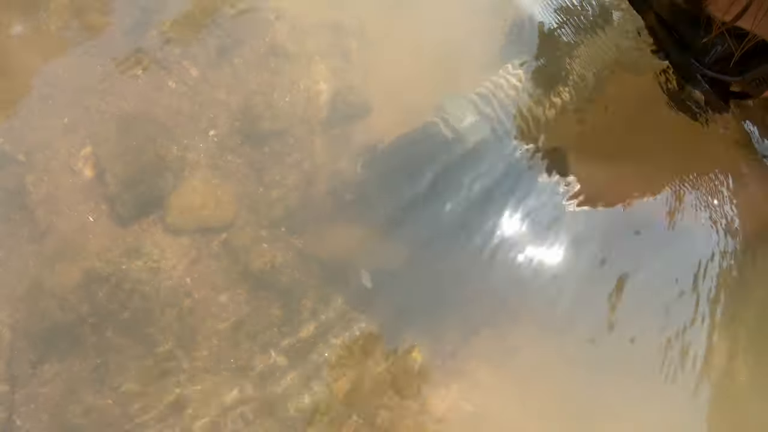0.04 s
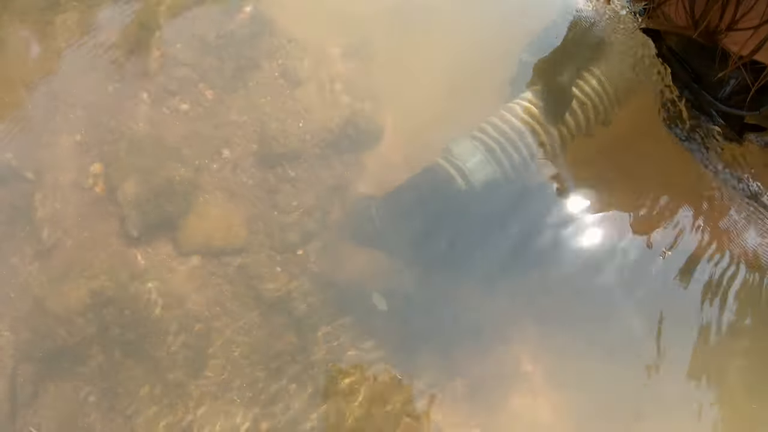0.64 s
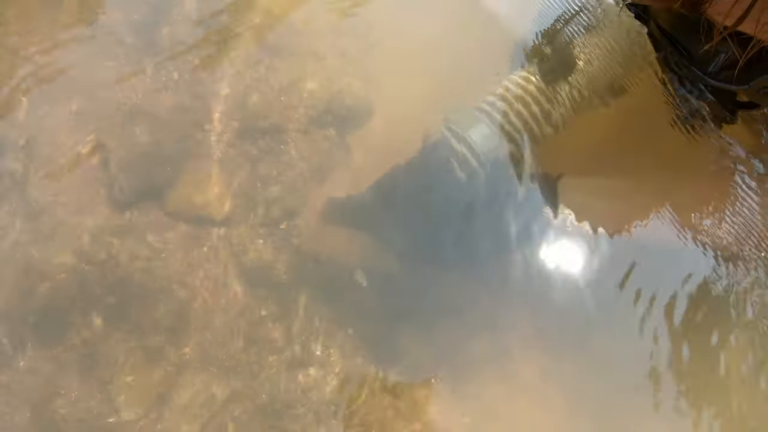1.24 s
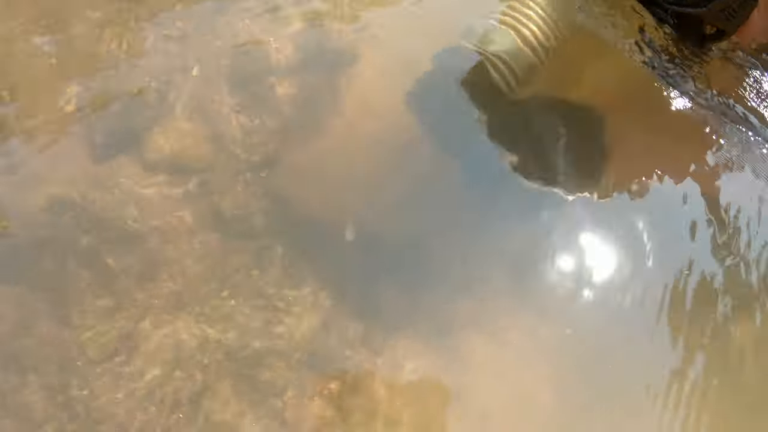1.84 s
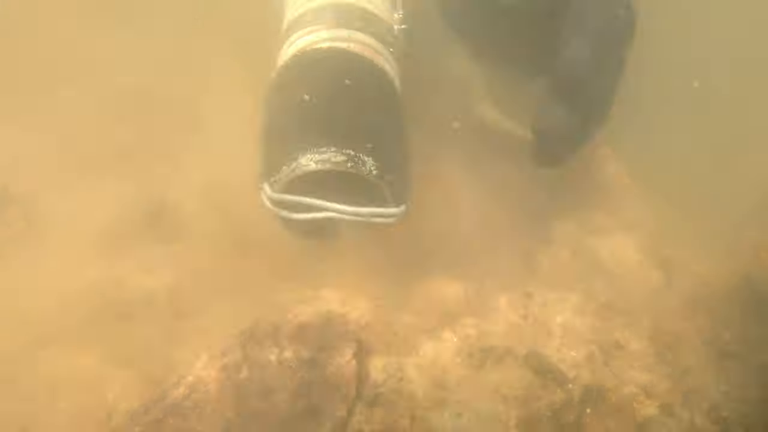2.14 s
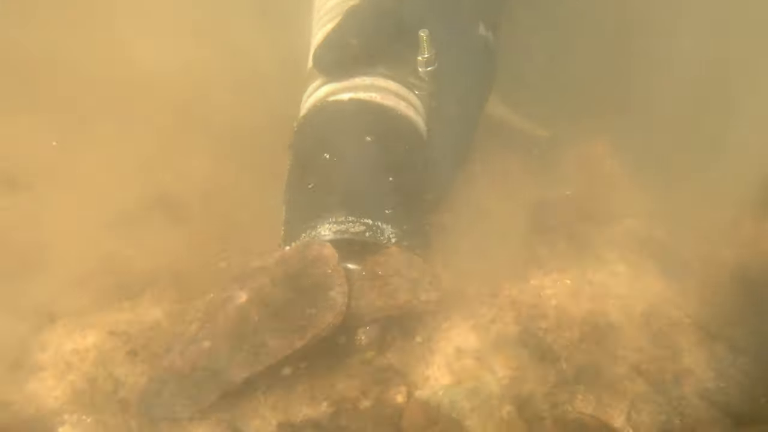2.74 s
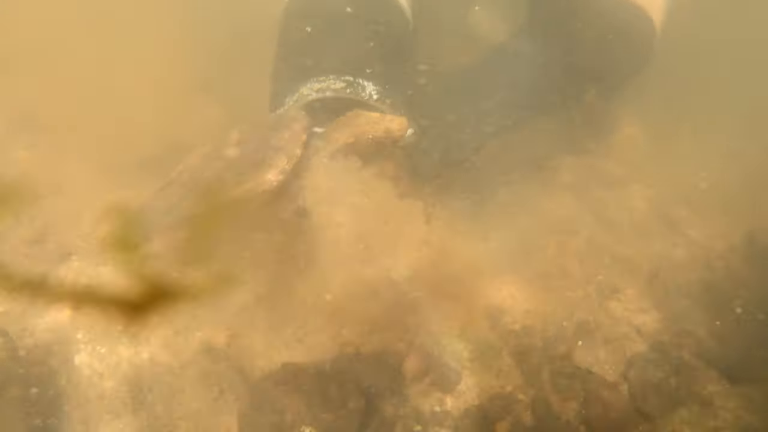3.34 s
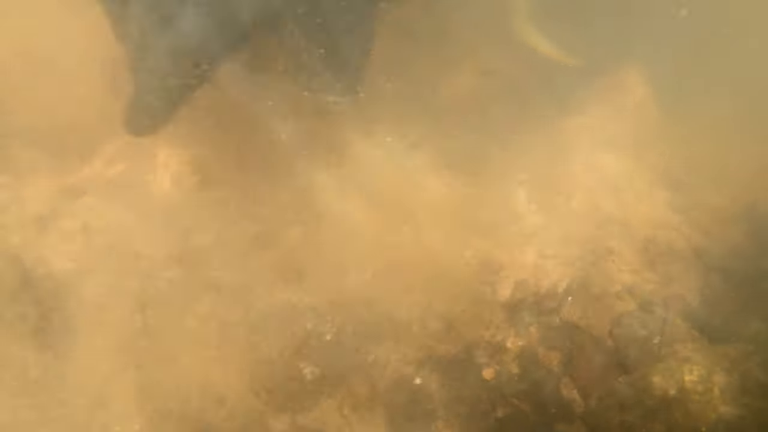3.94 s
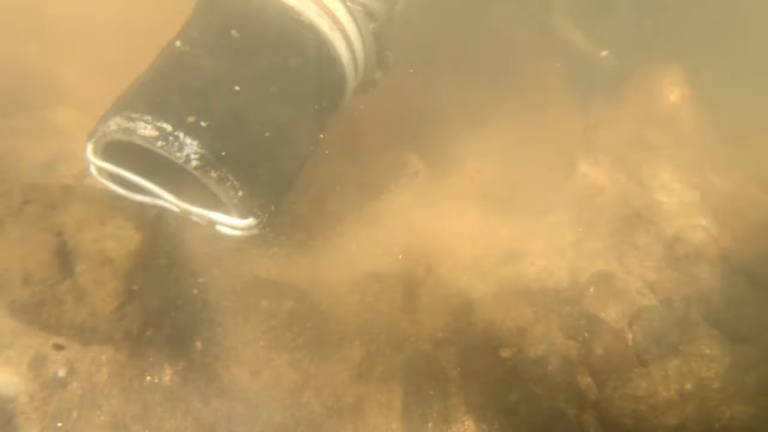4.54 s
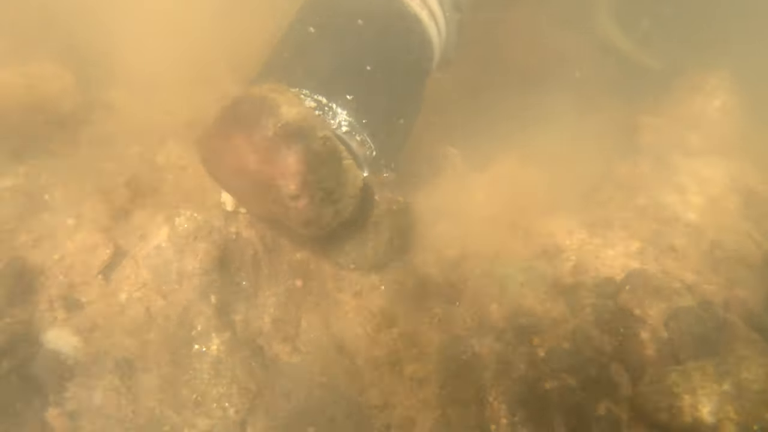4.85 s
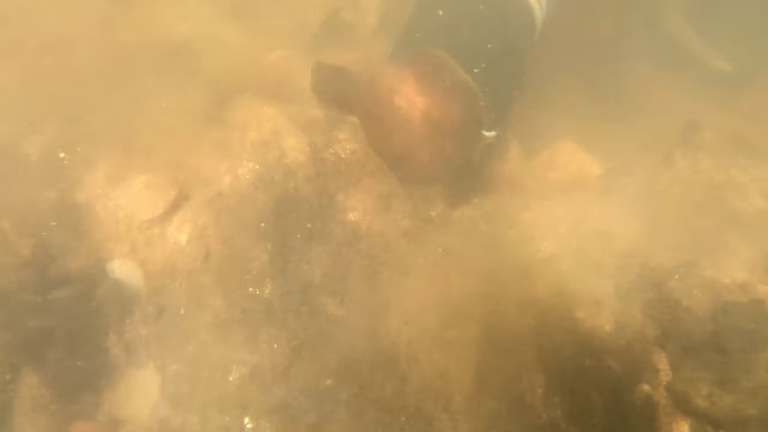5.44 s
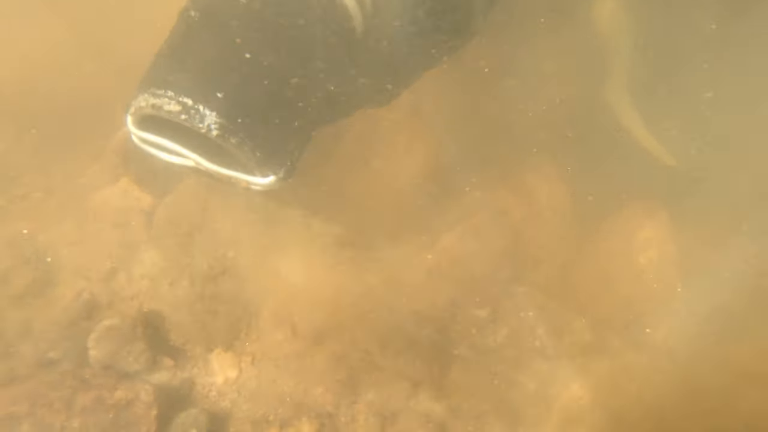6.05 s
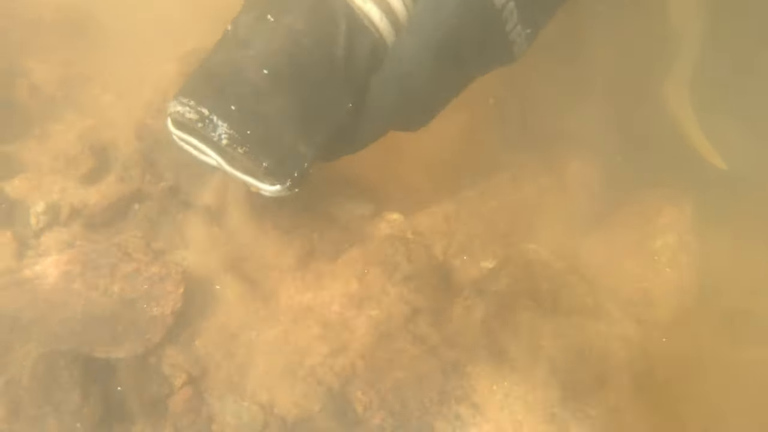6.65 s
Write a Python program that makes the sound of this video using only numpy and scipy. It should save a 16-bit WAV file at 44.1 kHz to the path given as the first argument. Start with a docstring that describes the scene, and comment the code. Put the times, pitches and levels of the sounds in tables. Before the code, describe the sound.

Underwater, pebbles tick and rattle into a suction nozzle over a low water rumble and the muffled hum of an engine and pump.

```python
"""A suction dredge's small four-stroke engine drones under water, its pump churning in step.
Gravel ticks and tumbles up the hose, stones grind and knock on the nozzle, a rock bumps in its mouth.
Bubbles plip; water rumbles past and hisses into the intake. A camera near the nozzle hears most of it
through the modes of its sealed housing, and hard knocks duck its gain."""
import sys
import numpy as np
from scipy import signal
from scipy.fft import rfft, irfft, next_fast_len
from scipy.io import wavfile
from scipy.ndimage import uniform_filter1d, minimum_filter1d, map_coordinates

SR = 44100
rng = np.random.default_rng(int(sys.argv[2]) if len(sys.argv) > 2 else 0)


def output_pcm(signal):
    """Save a mono or channel-first signal as 16-bit PCM at the path in sys.argv[1].

    Samples are clipped to [-1, 1] before scaling.
    """
    pcm = np.clip(np.atleast_2d(signal).T, -1, 1) * 32767
    wavfile.write(sys.argv[1], SR, np.round(pcm).astype(np.int16))


N = 295646

# Engine speed. Each row: time in seconds, firing rate in Hz.
FIRING_HZ = [(0, 31.3), (.25, 31.28), (.7, 30.73), (.98, 30.92), (1.32, 30.88), (1.58, 31.2), (1.85, 31.03),
             (2.25, 31.2), (2.56, 30.73), (2.92, 31.07), (3.2, 30.66), (3.6, 31.05), (3.95, 30.95),
             (4.55, 31.18), (5.45, 31.12), (5.85, 31.33), (6.7, 30.95)]
# How strongly the engine carries. Each row: time in seconds, gain in dB.
DRONE_DB = [(0, -14.5), (4.4, -15.5), (4.8, -19), (5.66, -18.5), (5.72, -20.5), (6.7, -20)]
# Engine and pump orders. Each row: multiple of the firing rate, left and right gain in dB.
ORDERS = [(2.003, -15, -14.5), (2.964, -16, -13.5), (4.023, -18.5, -17), (4.996, -17.5, -20),
          (5.972, -16, -16.5), (6.975, -28.5, -30), (9.004, -25.5, -19.5), (10.95, -26.5, -15),
          (11.934, -34, -17), (13.09, -25, -18), (14.03, -17, -15), (15.11, -27.5, -19),
          (16.09, -19, -14.5), (16.87, -19.5, -19), (17.92, -17, -15), (18.46, -17.5, -21),
          (19.92, -14, -19), (21.24, -13, -19.5), (21.99, -21, -23), (32.4, -26, -30)]
# Housing delay at the right microphone. Each row: frequency in Hz, lag in radians.
RIGHT_LAG_RAD = [(340, 0.01), (400, 1.74), (690, 3.5)]
# A rock blocks the nozzle; the pump labours. Each row: centre and half length in seconds, extra load in dB.
CHOKE = [(5.52, 0.11, -3)]

# Surges of sand, clacking stones and tumbling stones.
# Each row: centre in seconds, half length in seconds, level in dB.
GULPS = [(.54, 0.091, -39), (.79, 0.068, -36), (1.39, 0.04, -42.5), (2.59, 0.15, -38), (3.08, 0.031, -38),
         (3.95, 0.064, -42.5), (4.94, .2, -43.5)]
CLACKS = [(3.07, 0.078, -41.5), (3.92, 0.18, -42.5), (4.97, 0.23, -39)]
TUMBLES = [(3.05, 0.12, -29.5), (4.8, .045, -20), (5.25, .17, -26.5), (6.6, 0.18, -26)]
# Pebbles on the nozzle. Each row: time in seconds, level in dB, treble tilt in dB per octave.
PEBBLES = [(0.1275, -31.5, 6.5), (.401, -32.5, 4), (.5049, -23, 1.5), (0.5121, -24, 5), (.581, -32, 0.5),
           (.735, -27.5, 5.5), (0.7466, -31, 6), (0.76, -29, 14), (0.8188, -21.5, 3.5), (0.829, -30, 6.5),
           (1.5771, -35, 6.5), (2.5032, -35, 10.5), (2.522, -27, 8), (2.5656, -32, 8.5),
           (2.5826, -26, -0.5), (2.6676, -31.5, 7.5), (2.701, -26, -4), (2.7429, -32, -0.5),
           (2.802, -27.5, -9.5), (2.916, -28, 5.5), (2.9905, -30.5, -14), (3.025, -25.5, -5),
           (3.0409, -27, -9), (3.0925, -27.5, 1.5), (3.1374, -26.5, 1.5), (3.1978, -32, -1),
           (3.7722, -27.5, -4.5), (4.08, -34.5, 8), (4.592, -21.5, 1), (4.8814, -23.5, -1),
           (4.9183, -25.5, 1), (4.9417, -36.5, 4), (4.9624, -21.5, 5.5), (4.972, -24, -5.5),
           (5, -25.5, 2.5), (5.02, -21, -2), (5.1135, -32, 1.5), (5.382, -28, 3.5), (5.39, -27.5, 2.5),
           (5.446, -30.5, 4.5), (5.5304, -23.5, -1), (5.732, -26, 0.5), (6.541, -26.5, -2),
           (6.566, -21.5, -1)]
# Stones grinding. Each row: start in seconds, centre in Hz, peak in dB, length in seconds.
GRINDS = [(1.143, 1830, -15, 0.0079), (1.391, 1660, -15, 0.025), (1.412, 1320, -11, 0.027),
          (1.836, 1400, -14, 0.017), (1.897, 1580, -17.5, 0.018), (1.916, 1300, -8.5, 0.0053),
          (2.424, 1090, -7, 0.0055), (3.123, 1200, -11.5, 0.019), (3.955, 1560, -13.5, 0.0044),
          (4.748, 1710, -18, 0.03), (4.791, 1200, -24, 0.041), (5.023, 1390, -12.5, 0.018),
          (5.053, 1550, -19, 0.019), (5.083, 1150, -11.5, 0.012), (5.213, 1690, -18, 0.03),
          (5.284, 1100, -15.5, 0.0076)]
# Heavy stones on the nozzle. Each row: time in seconds, peak in dB, low-pass corner in Hz.
KNOCKS = [(4.4484, 3, 705), (4.5008, 3.5, 990), (4.512, -4, 1370), (5.057, -11, 1000), (6.434, -4, 810),
          (6.492, -13.5, 1010), (6.542, -2.5, 1380), (6.584, -2.5, 770), (6.608, -10.5, 840)]
# Rock bumps and bubbles. Each row: start in seconds, pitch in Hz, peak in dB.
THUMPS = [(2.703, 460, -10.5), (3.022, 394, -11.5), (4.645, 446, -15), (4.672, 390, -15.5),
          (4.695, 505, -11.5), (4.745, 346, -13), (4.788, 390, -13.5), (4.81, 382, -9.5), (5.008, 460, -15),
          (5.13, 423, -12.5), (5.3, 488, -15), (5.456, 477, -20), (5.643, 440, -15)]
BUBBLES = [(1.311, 1720, -26.5), (1.456, 944, -4), (1.927, 1450, -15.5), (4.852, 1126, -9.5),
           (6.2111, 1020, -13), (6.162, 840, -17.5), (6.286, 1720, -31), (6.311, 887, -12.5)]
# Two intake resonances, shifting as the nozzle moves and chokes.
# Each row: time in seconds, lower pitch in Hz, lower and upper level in dB.
INTAKE = [(0, 2250, -56, -56.5), (.65, 2150, -51, -53.5), (1, 2250, -48, -61), (1.35, 2352, -47.5, -55.5),
          (1.55, 2420, -55.5, -53), (2.3, 2250, -61, -55.5), (2.6, 2150, -59.5, -63.5),
          (3.5, 2450, -55, -65), (3.8, 2150, -55, -51.5), (4.4, 2350, -67, -57.5), (4.7, 2250, -63.5, -65),
          (5.7, 2250, -55.5, -63), (6.3, 2400, -66.5, -60.5)]

# Source spectra. Each row: frequency in Hz, gain in dB.
ENGINE_COLOUR = [(200, -18.5), (330, -11.5), (450, -7), (700, 6), (830, -9), (1020, 2.5), (1250, -12),
                 (4000, -100)]
PEBBLE_COLOUR = [(150, -18), (600, -2), (1000, 1), (1500, 5), (2600, -8.5), (3200, -5.5), (3700, -19.5),
                 (4200, -27), (6000, -35), (9000, -46), (13000, -63)]
CLACK_COLOUR = [(500, -8), (1300, -5), (2000, 1.5), (3200, -20.5), (6000, -65)]
TUMBLE_COLOUR = [(130, -7.5), (230, 3.5), (340, -2.5), (460, 3), (700, -8.5), (1100, -9.5), (2000, -20.5),
                 (4000, -63.5)]
HISS_COLOUR = [(150, -1.5), (1000, 4.5), (1450, -15), (2750, -17), (3700, -8.5), (4100, -39), (4800, -29),
               (6000, -38.5), (10000, -66)]
RUMBLE_COLOUR = [(12, -29), (25, -3.5), (48, 9), (80, 5.5), (120, 3.5), (170, -4), (250, -9), (400, -45.5),
                 (900, -102.5)]
WASH_COLOUR = [(120, -30.5), (300, 3.5), (850, -5), (1100, -9), (1300, -22), (1800, -30), (4000, -49),
               (8000, -67)]
# Housing modes. Each row: centre and width in Hz, left and right gain in dB, right lag in radians.
HOUSING_MODES = [(345.5, 102, -13, 3.5, 0.5), (435, 69.6, 0, 8, 2), (697, 210, 1.5, -6.5, -3.5),
                 (978, 63.5, -4, 2.5, 3.5), (1013, 235, 2.5, -3.5, 3), (1530, 550, -9.5, -7, -3),
                 (1938, 180, -6.5, -3, -2), (2195, 220, -18.5, -12.5, 1.5), (3115, 840, -1.5, -4.5, 0.04),
                 (3100, 317, -2, 3.5, 0.37), (4724, 438, 10, 1.5, 0.78), (6580, 1280, 5.5, 1, 1.6),
                 (9150, 980, 1, -8, -1.6)]


def engine(flutter_db=1, waver_db=1, churn_db=-17, top_exhaust_order=10):
    """One beat per firing: low orders from the exhaust, high ones from the pump, smeared by the water."""
    jitter_cycles, drift_cycles, dispersion_cycles = .0012, .002, 1 / 13
    firing_hz, = curves(FIRING_HZ)
    level_db, = curves(DRONE_DB)
    cycle = np.cumsum(firing_hz) / SR + jitter_cycles * wobble(35)
    load = 1 + swells(CHOKE)
    # two shaft turns per firing
    pulsing = 1 + 0.41 * np.sin(4 * np.pi * cycle) + .4 * np.sin(2 * np.pi * cycle)
    drone = amp(churn_db) * load * housed(rng.standard_normal(N) * pulsing, ENGINE_COLOUR)
    for order, left_db, right_db in ORDERS:
        gain = 1 if order <= top_exhaust_order else load * amp(waver_db * wobble(7))
        drift = drift_cycles * order * wobble(10)
        phase = 2 * np.pi * (order * cycle - dispersion_cycles * order ** 2 + drift)
        lag_rad = np.interp(order * firing_hz.mean(), *np.transpose(RIGHT_LAG_RAD))
        drone += np.sqrt(2) * gain * amp([[left_db], [right_db]]) * np.sin([phase, phase - lag_rad])
    return amp(level_db + flutter_db * wobble(40)) * drone


def gravel(lurch_db=7.5, grit_db=-9.5, trickle_db=-52, rolling_db=-35.5):
    """Sand and brighter grit skid in by the gulp; bigger stones clack and tumble along the hose."""
    sand = housed(skids(rate_hz=230, spread_db=2.8, life_s=.0013), PEBBLE_COLOUR)
    grit = housed(np.gradient(skids(rate_hz=120, spread_db=3.5, life_s=.0009)), PEBBLE_COLOUR)
    lurching = grains(rate_hz=900, spread_db=2.5) * amp(lurch_db * np.tanh(wobble(25)))
    tumble = housed(lurching, TUMBLE_COLOUR)
    clack = housed(grains(rate_hz=140, spread_db=3), CLACK_COLOUR)
    sand_flow = swells(GULPS) + amp(trickle_db)
    stone_flow = swells(TUMBLES) + amp(rolling_db)
    return sand_flow * (sand + amp(grit_db) * grit) + swells(CLACKS) * clack + stone_flow * tumble


def skids(rate_hz, spread_db, life_s):
    """Small stones scraping, each a decaying burst of noise."""
    fade = np.exp(-1 / (life_s * SR))
    envelope = signal.lfilter([1], [1, -fade], np.abs(grains(rate_hz, spread_db)))
    return envelope * rng.standard_normal(N)


def grains(rate_hz, spread_db):
    """Random tiny impacts, a few much stronger than the rest."""
    strength = amp(spread_db * np.minimum(rng.exponential(size=N), 3))
    return strength * rng.choice([-1, 1], N) * (rng.random(N) < rate_hz / SR)


def pebbles(gain_db=-2, vary_db=1, scrape=0.12, t60_s=0.017, size=2048):
    """Sharp contact, brief scrape; harder contacts are brighter, and each spot weights the modes anew."""
    track, t = np.zeros((2, N)), np.arange(size) / SR
    for s, db, tilt_db in PEBBLES:
        contact = scrape * rng.standard_normal(size) * amp(-60 * t / t60_s)
        contact[0] = 1
        contact = np.roll(contact, SR // 1000)  # 1 ms of room for the filter's lead-in
        tilt = lambda hz: amp(tilt_db * np.log2(np.clip(hz, 1500, 7000) / 3200))
        tick = filtered(contact, lambda hz: colour(PEBBLE_COLOUR, hz) * tilt(hz) * housing(hz, vary_db))
        steepest = np.abs(np.diff(tick)).max()
        add(track, s - .001, amp(db + gain_db) * tick / steepest)
    return track


def grinds(q=1.16, top_hz=2500, size=6144):
    """A short run of tiny slips rings one broad resonance of the stones."""
    track, t = np.zeros((2, N)), np.arange(size) / SR
    for s, centre_hz, db, length_s in GRINDS:
        slips = rng.standard_normal(size) * np.sin(np.pi * np.minimum(t / length_s, 1))
        band = lambda hz: 1j * hz * centre_hz / (q * (centre_hz ** 2 - hz ** 2) + 1j * hz * centre_hz)
        grind = filtered(slips, lambda hz: band(hz) ** 2 * housing(hz) / (1 + (hz / top_hz) ** 8))
        add(track, s, at_peak(grind, db))
    return track


def knocks(low_cut_hz=500, size=2048):
    """Heavy stones stay in contact longer, so they ring only the housing's low modes."""
    track, impulse = np.zeros((2, N)), signal.unit_impulse(size, "mid")
    low_cut = lambda hz: 1j * hz / (low_cut_hz + 1j * hz)
    for s, db, corner_hz in KNOCKS:
        push = lambda hz: 1 / (1 + 1.2j * hz / corner_hz - (hz / corner_hz) ** 2)
        knock = filtered(impulse, lambda hz: push(hz) * low_cut(hz) * muffled(hz) * housing(hz))
        add(track, s - size / 2 / SR, at_peak(knock, db))
    return track


def thumps(swell_s=0.0018, t60_s=0.023, size=4096):
    """A rock rocks in the nozzle's mouth: one short hollow note per bump."""
    track, t = np.zeros((2, N)), np.arange(size) / SR
    envelope = (1 - np.exp(-t / swell_s)) * amp(-60 * t / t60_s)
    for s, pitch_hz, db in THUMPS:
        ring = np.sin(2 * np.pi * pitch_hz * t) * envelope
        thump = filtered(ring, lambda hz: housing(hz) * muffled(hz))
        add(track, s, at_peak(thump, db))
    return track


def bubbles(ragged=0.16, chirp_per_s=6, swell_s=0.012, t60_s=0.011, size=2048):
    """Each bubble swells, rings raggedly and rises in pitch; smaller, higher ones break off around it."""
    shed_count, scatter_s, shed_ratio, shed_db = 3, 0.016, 1.35, -17
    track, t = np.zeros((2, N)), np.arange(size) / SR
    envelope = (1 - np.exp(-t / swell_s)) * amp(-60 * t / t60_s)
    shed = [(s + scatter_s * offset, pitch_hz * shed_ratio ** (1 + detune), db + shed_db)
            for s, pitch_hz, db in BUBBLES
            for offset, detune in rng.uniform(-1, 1, (shed_count, 2))]
    for s, pitch_hz, db in list(BUBBLES) + shed:
        ring = np.sin(2 * np.pi * pitch_hz * t * (1 + chirp_per_s * t)) * envelope
        ring *= 1 + ragged * rng.standard_normal(size)
        plip = filtered(ring, lambda hz: housing(hz) * muffled(hz))
        add(track, s, at_peak(plip, db))
    return track


def intake(upper_ratio=1.5, hiss_db=-39.5, follow=0.44, flicker_db=1.5):
    """Water rushes into the hose: broad hiss under two gliding resonances."""
    pitch_hz, lower_db, upper_db = curves(INTAKE)
    hiss_gain = amp(hiss_db + follow * (upper_db - upper_db.mean()))
    hiss = hiss_gain * housed(rng.standard_normal(N), HISS_COLOUR)
    lower = amp(lower_db) * resonance(pitch_hz)
    upper = amp(upper_db) * resonance(upper_ratio * pitch_hz)
    return amp(flicker_db * wobble(70)) * (hiss + lower + upper)


def resonance(centre_hz, half_width_hz=260):
    """Rushing water rings at a moving pitch, heard inside the housing."""
    band = filtered(rng.standard_normal(N), lambda hz: 1 / (1 + (hz / half_width_hz) ** 4))
    return housed(band * np.cos(2 * np.pi * np.cumsum(centre_hz) / SR), HISS_COLOUR)


def stream(rumble_db=-23, growth_db_per_s=.5, wash_db=-34.5):
    """Eddies and a soft wash press on each microphone separately; the work slowly stirs the eddies up."""
    noise = lambda points: unit(filtered(rng.standard_normal((2, N)), lambda hz: colour(points, hz)))
    rumble = amp(rumble_db + growth_db_per_s * np.arange(N) / SR) * noise(RUMBLE_COLOUR)
    return rumble + amp(wash_db) * noise(WASH_COLOUR)


def housing(hz, vary_db=0):
    """Left and right response: many modes push the two microphones in opposite directions."""
    response = np.zeros((2, len(hz)), complex)
    for k, (centre_hz, width_hz, left_db, right_db, lag_rad) in enumerate(HOUSING_MODES):
        mode = (-1) ** k * 1j * hz * width_hz / (centre_hz ** 2 - hz ** 2 + 1j * hz * width_hz)
        pickup = [amp(left_db), amp(right_db) * np.exp(-1j * lag_rad)]
        response += np.outer(pickup, mode * amp(vary_db * rng.normal()))
    return response


def housed(pressure, points):
    """Coloured water pressure heard inside the housing, at rms 1."""
    return unit(filtered(pressure, lambda hz: colour(points, hz) * housing(hz)))


def muffled(hz, corner_hz=2330):
    """Low-pass response: soft blows hardly reach the high modes."""
    return signal.freqs(*signal.butter(4, 1, analog=True), hz / corner_hz)[1]


def amp(db):
    """Decibels to gain."""
    return 10 ** (np.asarray(db) / 20)


def unit(x):
    """x at rms 1."""
    return x / np.sqrt(np.mean(x ** 2) + 1e-20)


def at_peak(x, db):
    """x with its peak at db."""
    return amp(db) * x / np.abs(x).max()


def colour(points, hz):
    """Gain through (Hz, dB) points on a log axis."""
    points_hz, db = np.transpose(points)
    return amp(np.interp(np.log(hz + 1), np.log(points_hz + 1), db))


def curves(rows):
    """One value per sample for each column after the time."""
    s, *columns = np.transpose(rows)
    return [np.interp(np.arange(N) / SR, s, column) for column in columns]


def swells(rows):
    """Gain curve, one Gaussian bump per row."""
    t = np.arange(N) / SR
    return sum(amp(db) * np.exp(-((t - s) / half_s) ** 2) for s, half_s, db in rows)


def wobble(rate_hz):
    """Smooth random curve, rate_hz knots a second."""
    knots = rng.standard_normal(int(N * rate_hz / SR) + 4)
    return map_coordinates(knots, [np.arange(N) * rate_hz / SR])


def filtered(x, response):
    """x through a complex frequency response."""
    n = x.shape[-1]
    padded = next_fast_len(n + 4096)
    return irfft(rfft(x, padded) * response(np.fft.rfftfreq(padded, 1 / SR)), padded)[..., :n]


def add(track, start_s, sound):
    """Mix a short stereo sound in at start_s."""
    start = round(start_s * SR)
    track[:, start:start + sound.shape[1]] += sound[:, :N - start]


def scene():
    """All sources at the two microphones."""
    return engine() + gravel() + pebbles() + grinds() + knocks() + thumps() + bubbles() + intake() + stream()


def record(dry, ceiling_db=-3.5, threshold_db=-15.5, attack_s=0.01, release_db_per_s=85):
    """Gain control ducks after loud, bright peaks, the bass less than the rest, and recovers steadily."""
    bass_hz, sense_hz, top_hz = 150, 863, 13600
    depth, bass_share, window = 1.33, 0.056, 24
    over_db = lambda x, db: np.maximum(20 * np.log10(np.abs(x).max(axis=0) + 1e-9) - db, 0)
    bass = filtered(dry, lambda hz: 1 / (1 + (hz / bass_hz) ** 4))
    upper = dry - bass
    # fast limiter
    peak_db = -minimum_filter1d(-over_db(upper, ceiling_db), 2 * window)
    fast_db = uniform_filter1d(uniform_filter1d(peak_db, window), window)
    # slow stage: the held excess falls at the release rate; depth scales it into gain reduction
    bright = filtered(dry, lambda hz: 1 - 1 / (1 + (hz / sense_hz) ** 6))
    recovery_db = release_db_per_s * np.arange(N) / SR
    held_db = np.maximum.accumulate(over_db(bright, threshold_db) + recovery_db) - recovery_db
    step = 1 / (attack_s * SR)
    slow_db = depth * signal.lfilter([step], [1, step - 1], held_db)
    duck_db = np.maximum(fast_db, slow_db)
    ducked = upper * amp(-duck_db) + bass * amp(-bass_share * duck_db)
    return filtered(ducked, lambda hz: hz < top_hz)


dry = scene()
out = record(dry)
output_pcm(out)
```